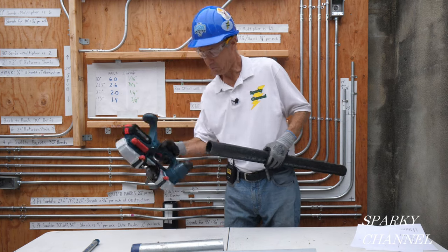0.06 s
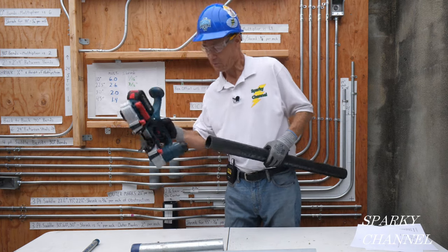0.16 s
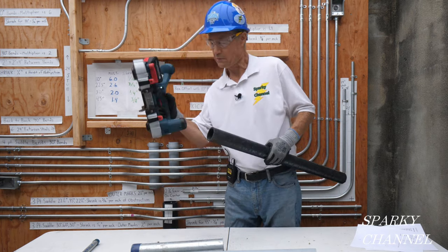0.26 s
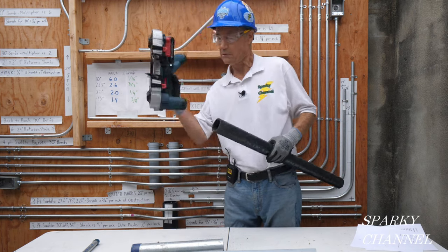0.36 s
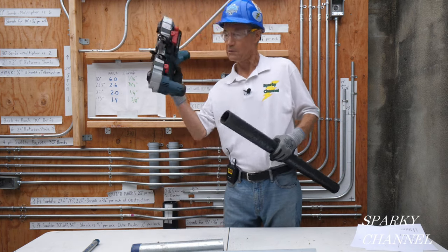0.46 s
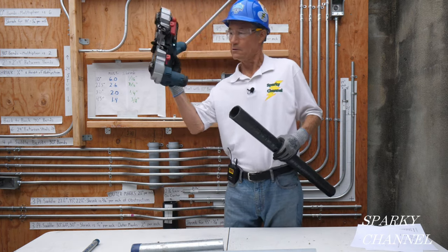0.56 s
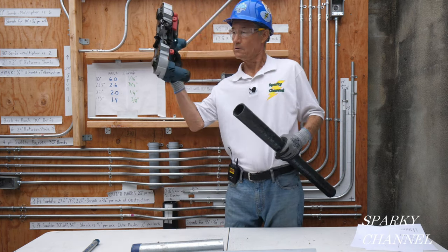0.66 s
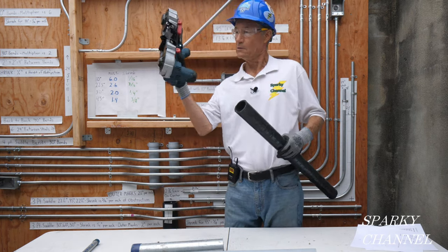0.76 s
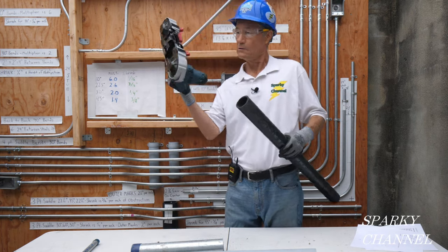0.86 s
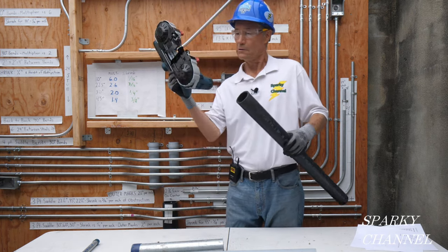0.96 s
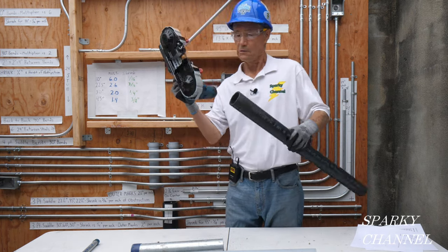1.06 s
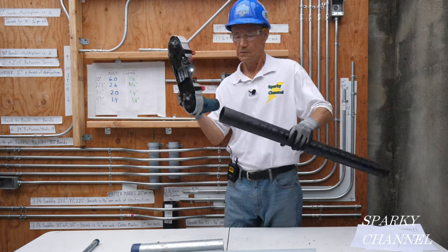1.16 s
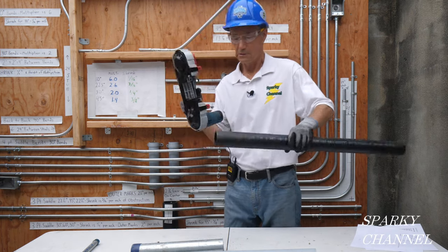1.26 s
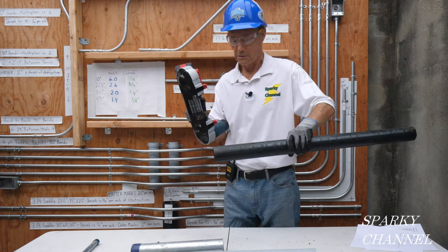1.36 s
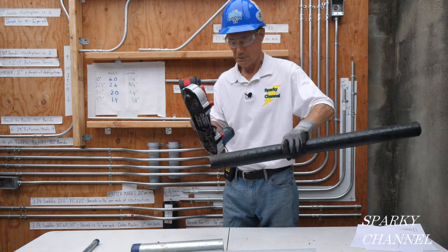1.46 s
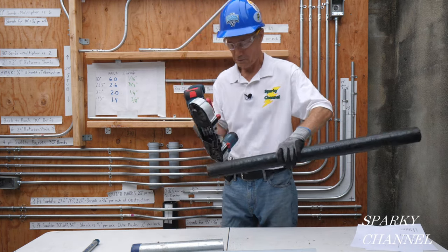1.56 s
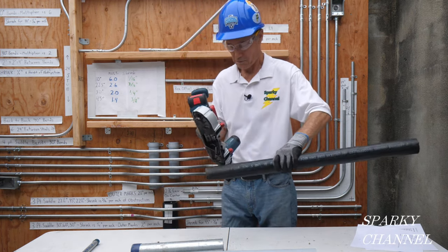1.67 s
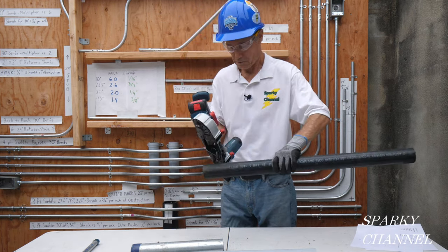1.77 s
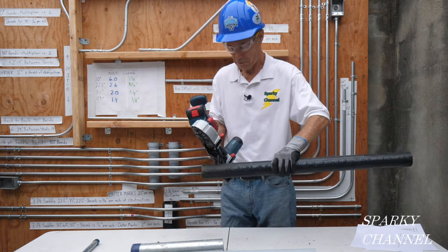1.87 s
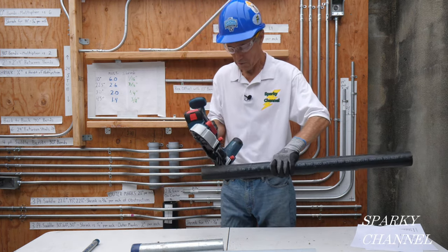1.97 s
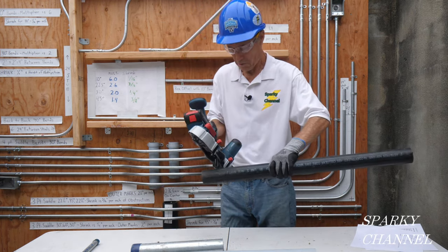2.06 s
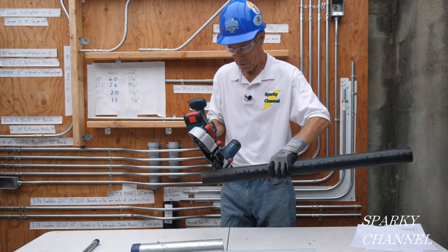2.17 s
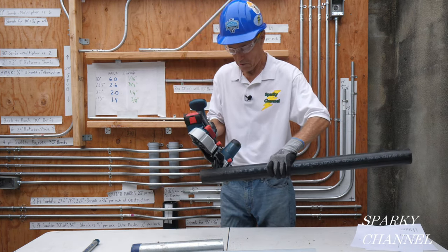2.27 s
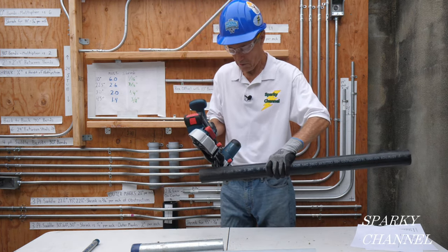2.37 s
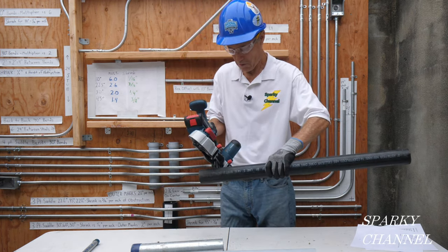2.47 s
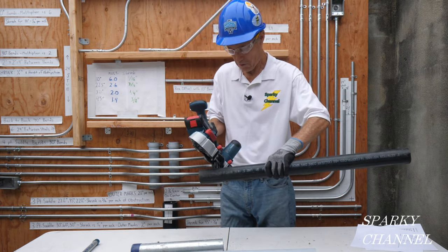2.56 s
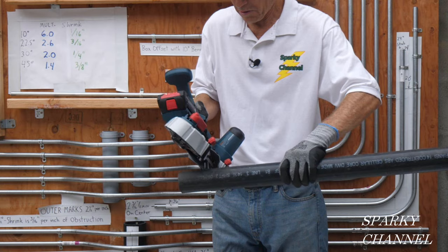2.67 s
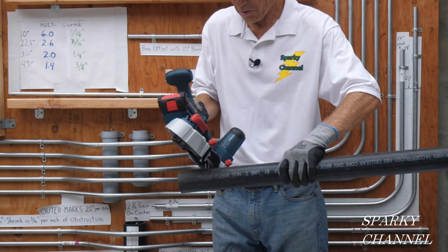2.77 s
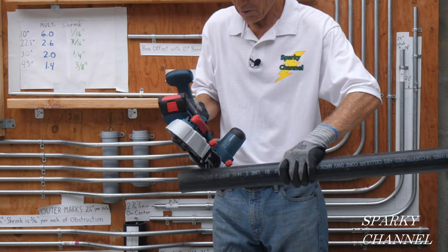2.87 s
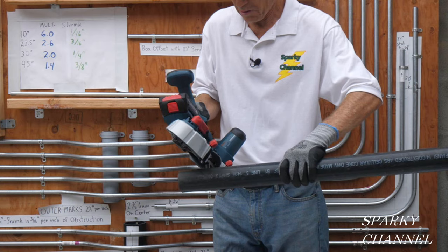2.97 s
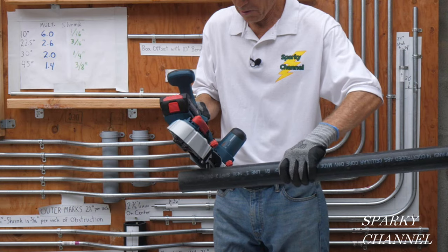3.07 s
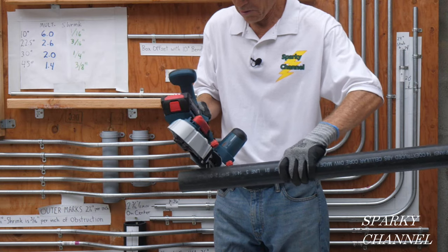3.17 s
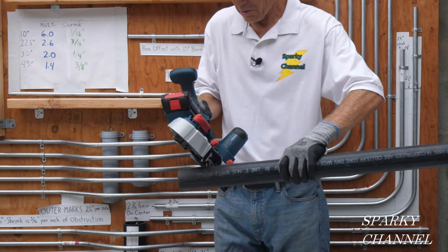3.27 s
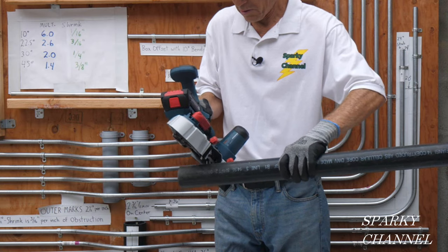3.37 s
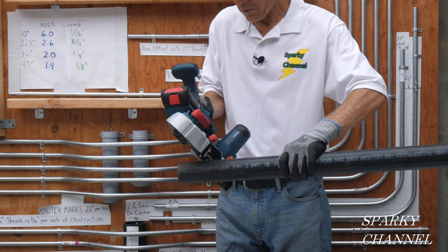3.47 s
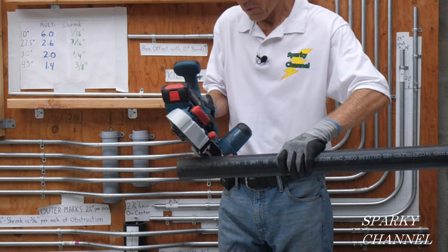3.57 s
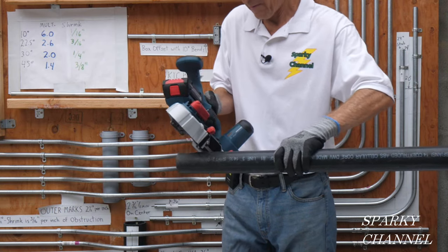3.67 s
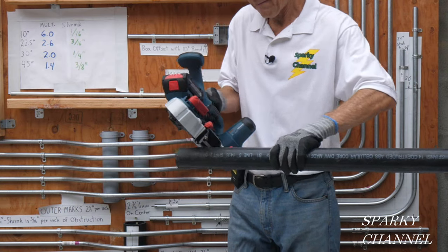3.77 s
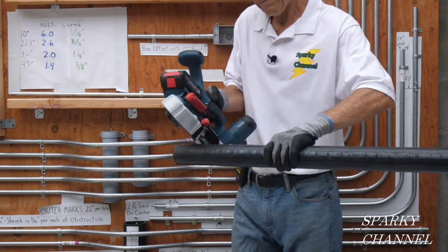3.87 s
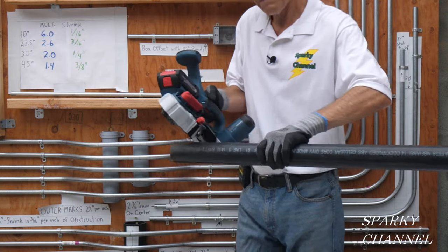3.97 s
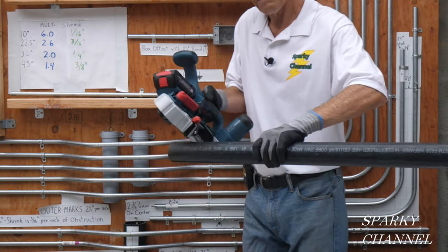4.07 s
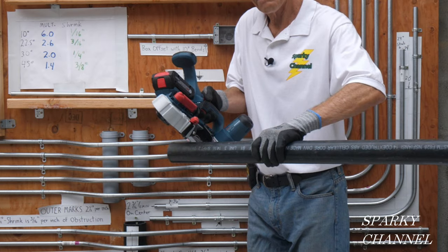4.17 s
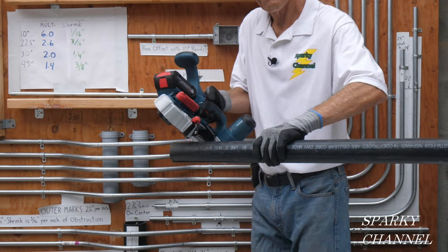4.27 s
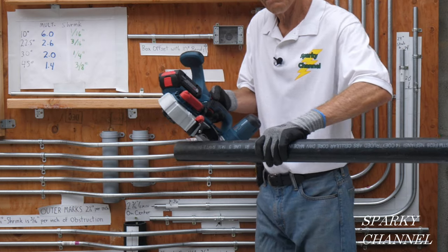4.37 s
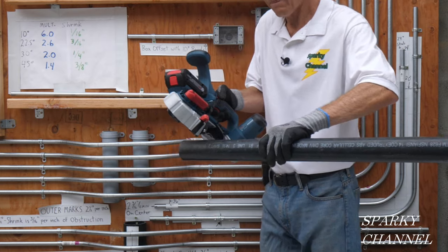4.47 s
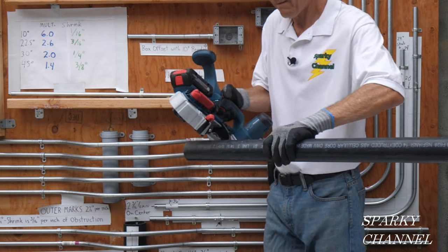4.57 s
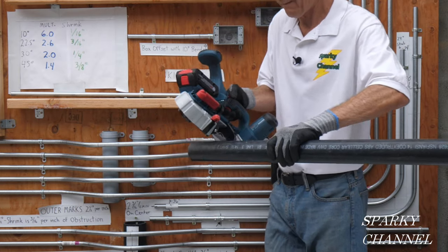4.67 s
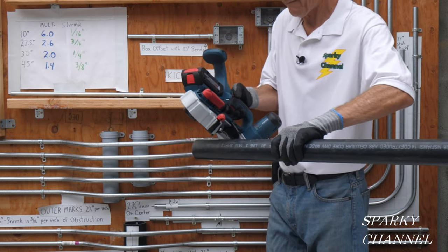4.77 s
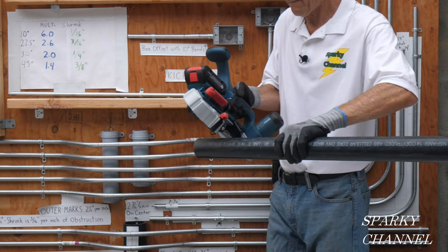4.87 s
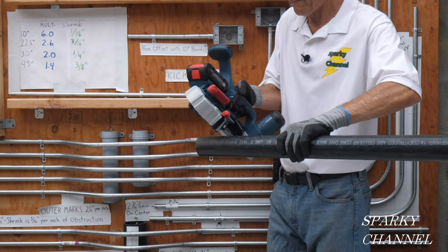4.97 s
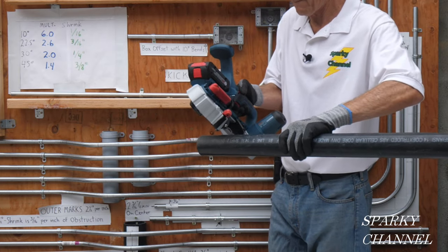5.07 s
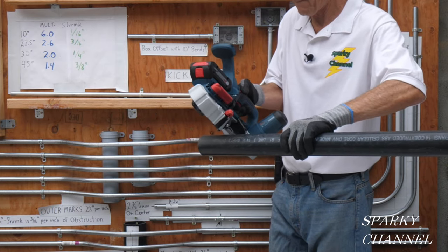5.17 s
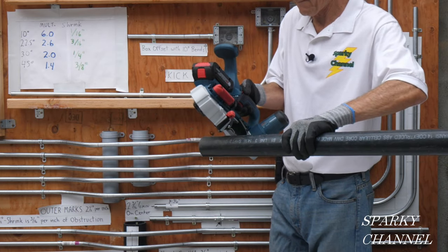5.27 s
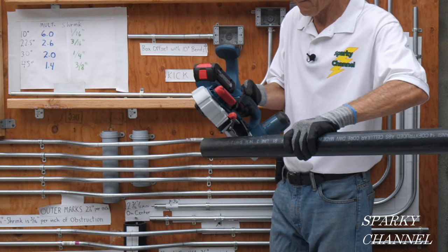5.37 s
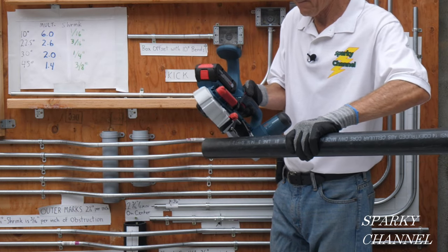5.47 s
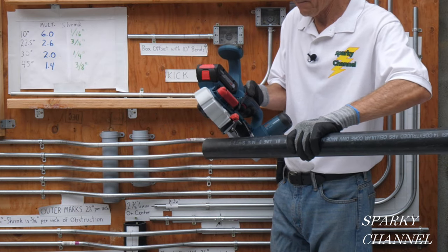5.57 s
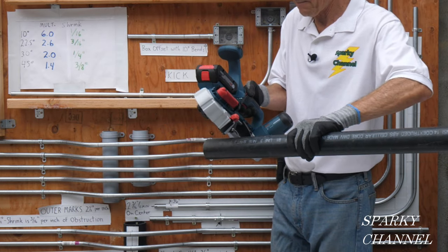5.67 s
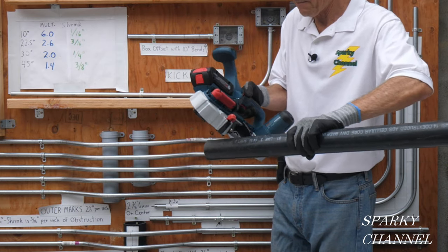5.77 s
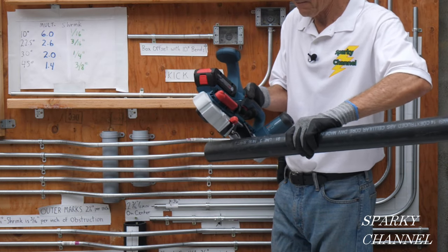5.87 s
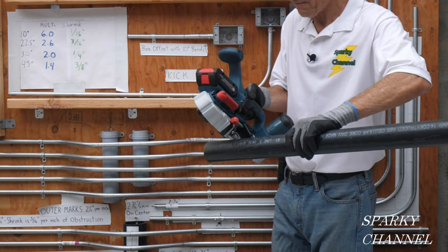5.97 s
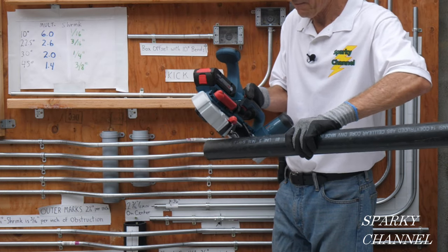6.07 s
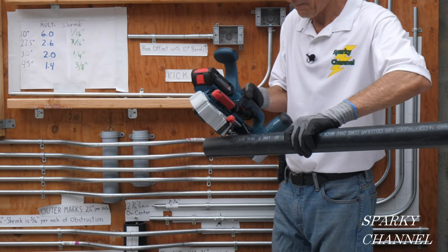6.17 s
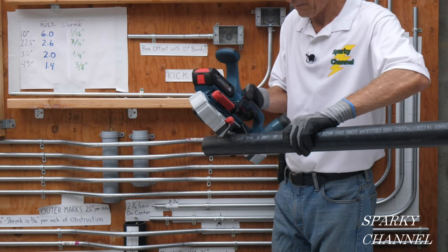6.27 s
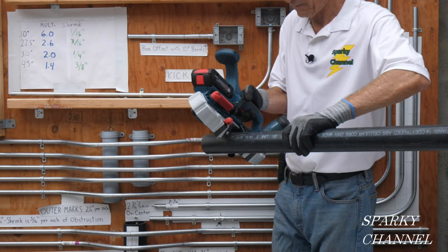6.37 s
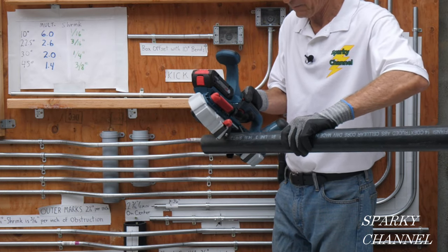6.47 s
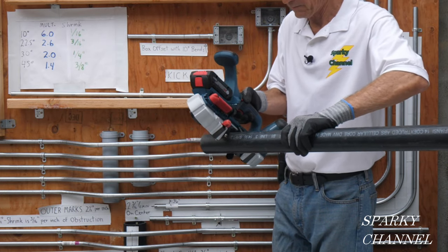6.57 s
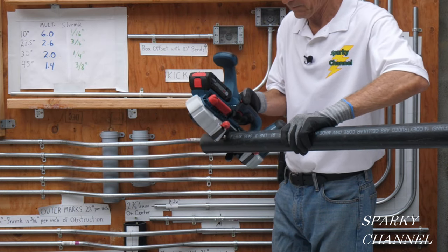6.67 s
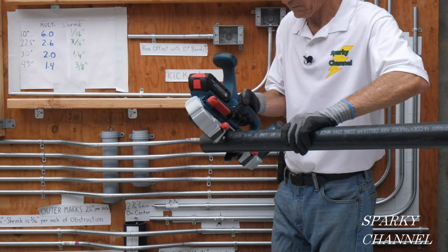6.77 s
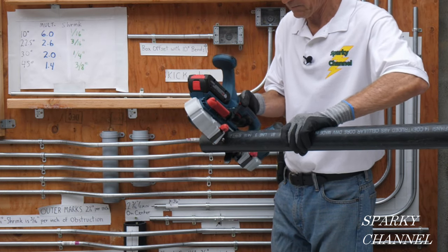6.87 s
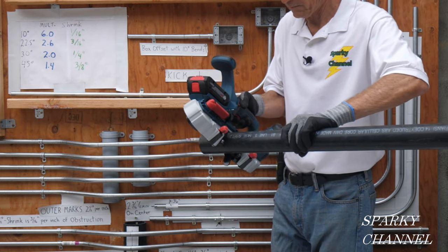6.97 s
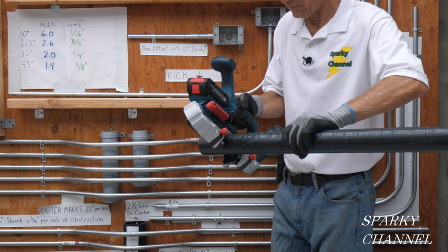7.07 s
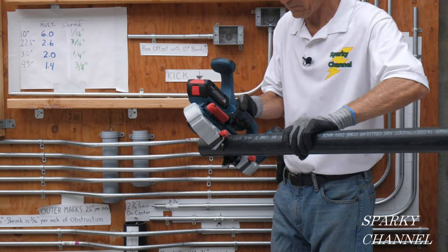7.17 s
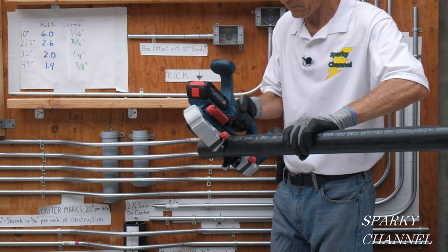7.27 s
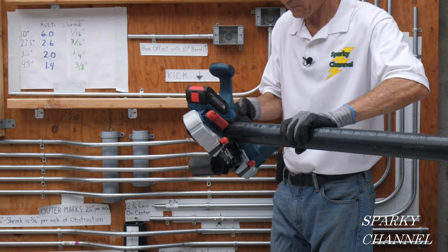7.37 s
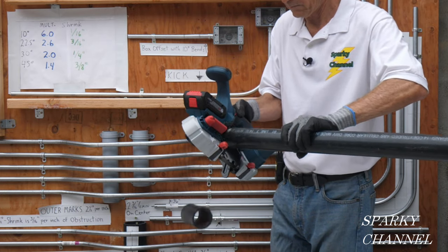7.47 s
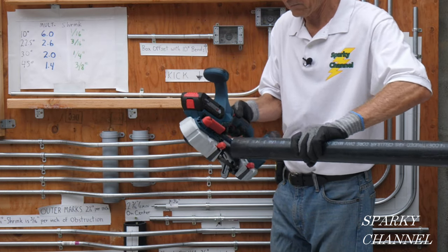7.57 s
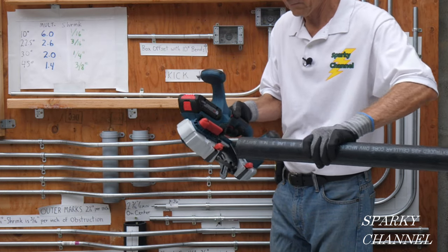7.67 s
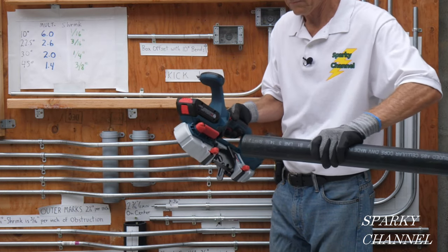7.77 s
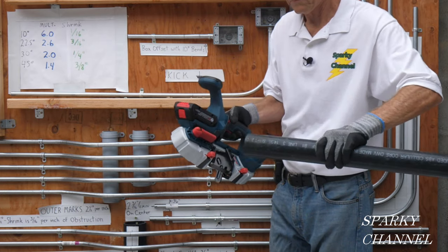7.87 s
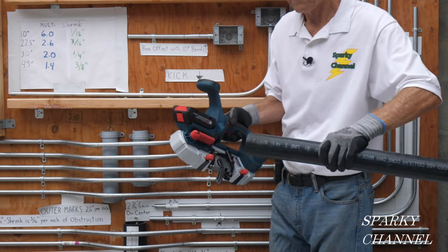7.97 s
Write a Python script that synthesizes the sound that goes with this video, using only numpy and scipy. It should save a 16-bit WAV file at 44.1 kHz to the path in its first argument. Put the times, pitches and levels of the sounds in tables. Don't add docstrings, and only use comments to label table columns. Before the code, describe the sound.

A quiet open workshop, with low distant traffic and wind rumble and faint machinery drones, picked up by one close microphone, nearly mono. A small switch click sounds at the very start, and a sharper double click at 0.5 to 0.65 seconds. The band saw motor then spins up, reaching full speed by about 1.2 seconds: a clear high gear whine over housing roar and bright blade hiss, growing more forward as the saw is lowered. It runs steadily until 5.8, when the blade bites twice with short falling skids. From 6.1 to 7.4 it scrapes through plastic pipe, the pitch sagging and the whine dulled, with groans and a shaking chatter strongest around 6.3 to 6.5, then easing. At 7.4 the speed springs back; the offcut parts with a light knock, strikes the floor loudly and hollowly at 7.7, and bounces near 7.85. The saw keeps whining to the end at 8.

```python
import sys
import numpy as np
from scipy import signal
from scipy.io import wavfile
from scipy.ndimage import uniform_filter1d, minimum_filter1d

SR = 44100
rng = np.random.default_rng(int(sys.argv[2]) if len(sys.argv) > 2 else 0)


def gain_from_db(level_db):
    decades = np.asarray(level_db, float) / 20
    return 10 ** decades


def inscribe(sig):
    pcm = np.round(np.clip(np.atleast_2d(sig).T, -1, 1) * 32767)
    wavfile.write(sys.argv[1], SR, pcm.astype(np.int16))


N = 353241
TIME_S = np.arange(N) / SR

# f/Hz, level/dB
YARD_SPECTRUM = [(100, -30), (160, -15), (250, -10), (420, -18.5), (700, -15), (1100, -17), (1700, -27),
                 (2850, -40.5), (6000, -48.5), (15500, -49)]
YARD_DB = -56.5
# f/Hz, level/dB
RUMBLE_SPECTRUM = [(18, -26), (35, -8), (62, -6), (110, -9), (200, -27), (400, -58)]
RUMBLE_DB, RUMBLE_RISE_DB_PER_S, GUST_DB = -60.5, .5, 1.6
# t/s, length/s, f/Hz, width/Hz, level/dB
DRONES = [
    (.01, .42, 120, 5, -62),
    (.55, .55, 241, 6, -63),
    (.8, 1.05, 61, 8, -63),
    (1.25, .95, 110, 5, -62),
    (4.15, .3, 305, 40, -60),
]

# t/s, peak level/dB, rise/s, t60/s, ring f/Hz
CLICKS = [
    (.004, -36.5, 0.002, 0.025, 2620),
    (.5105, -45, .002, .03, 1800),
    (.513, -36, 0.0016, 0.014, 2900),
    (0.5156, -41, .0006, 0.0099, 5400),
    (0.646, -34, .0008, .012, 3240),
    (.648, -34, 0.00054, 0.02, 2000),
    (7.693, -25, 0.0015, .045, 4900),
]
# f/Hz, level/dB
SWITCH_SPECTRUM = [(400, -10), (1400, 0), (2600, -2), (3600, -11), (6000, -8), (9000, -14), (11000, -11),
                   (15000, -25)]

# t/s, unloaded f/Hz, level/dB
MESH = [(.86, 3812, -50), (1.08, 3812, -47.5), (1.28, 3812, -38), (1.4, 3814, -43), (1.62, 3820, -30),
        (2.2, 3807, -26), (2.5, 3816, -25.5), (2.75, 3807, -25), (3.15, 3822, -25), (3.75, 3816, -28),
        (3.95, 3826, -26), (4.4, 3801, -34), (4.85, 3823, -32), (5.2, 3821, -33.5), (5.5, 3801, -33.5),
        (7.6, 3824, -30), (7.85, 3815, -29), (8.01, 3815, -34)]
# multiple of mesh f, free level/dB, extra level under load/dB
SHAFT_ORDERS = [(.103, -65, 8), (.2, -64, 1), (.5, -63, 17), (.75, -64, 18), (.9, -52, -3), (1.1, -63, 1),
                (1.4, -60, 1), (1.5, -60, 17), (1.6, -61, 1), (3.0, -56, -3)]
START_S, SPIN_HZ_PER_S, SETTLE_S = .672, 7750, .064
FREED_S, RECOVER_S = 7.425, .05

# f/Hz, level/dB
ROAR_SPECTRUM = [(150, -28.5), (400, -19), (700, -20), (860, -14), (1300, -13.5), (2100, -9), (3400, -7.5),
                 (3900, -12), (6100, -21), (9000, -26)]
# f/Hz, width/Hz, level/dB
HOUSING_MODES = [(1000, 270, 9.5), (1647, 590, 12), (2556, 180, 5.5)]
# f/Hz, level/dB
HISS_SPECTRUM = [(2500, -22.5), (4500, -8.5), (6100, -7), (8400, -0.5), (10000, -5.5), (12200, -6.5),
                 (14500, -13), (15800, -15.5)]
# f/Hz, width/Hz, level/dB
GUIDE_MODES = [(4240, 460, 4), (4970, 340, -2.5), (7000, 350, 1), (8400, 500, 0.5), (11450, 120, 3)]
# t/s, length/s, f/Hz, width/Hz, level/dB
TURNS = [
    (.68, 0.32, 2350, 700, -57),
    (.99, 0.38, 2480, 220, -43.5),
    (.72, 0.24, 965, 200, -57.5),
    (.95, .39, 880, 200, -51),
    (1.15, 0.54, 5735, 60, -51),
    (1.45, 0.78, 8900, 800, -45.5),
    (1.9, .51, 10350, 150, -55),
    (2.3, 2.2, 8340, 400, -46.5),
    (4.1, 1.7, 11560, 300, -48),
    (7.45, .6, 8400, 500, -59),
]
ROAR_DB, ROAR_LAW, HISS_DB, HISS_LAW = -33, 1.95, -36, 1.62
SHIELD_DB, LOWERED_S, TURNED_DB = -3, 1.7, -2

# t/s, speed sag/Hz, bite level/dB, whine level change/dB
TOUCH = [
    (5.55, 0, -32, 1),
    (5.68, 40, -33.5, 0.5),
    (5.79, 85, -32, -1.5),
    (5.826, 369.5, -26.5, -14),
    (5.86, 469.5, -37, -10),
    (5.89, 485.5, -27.5, -18),
    (5.93, 420, -36, -19),
    (5.96, 320, -33.5, -5),
    (6.12, 240, -34.5, -15),
]
# t/s, speed sag/Hz, bite level/dB, whine level change/dB
CUT = [
    (6.18, 315, -30, -12),
    (6.26, 550, -24.5, -16),
    (6.33, 560, -27.5, -3.5),
    (6.46, 545, -24.5, -5),
    (6.59, 325, -29, -7.5),
    (6.76, 285, -25.5, -8),
    (6.92, 350, -27, -8.5),
    (7.16, 298, -31, -9),
    (7.41, 310, -30.5, -6.5),
]
BITE_DB = -28
# f/Hz, level/dB
SCRAPE_SPECTRUM = [(150, -13), (700, -3.5), (1700, 0.5), (2600, -2.5), (4200, -1), (6500, -1), (9500, -3),
                   (12500, -11.5), (15800, -16)]
# f/Hz, width/Hz, level/dB
BLADE_MODES = [(1780, 69, 13), (2670, 230, 4.5), (3090, 260, 5.5), (7100, 120, -3), (8400, 180, 7.5),
               (9800, 200, 2), (11480, 220, 10)]
WALL_HZ, WALL_DROP, WALL_DB, WALL_LAW, WALL_FADE_DB_PER_S = 1550, 0.49, -35, 1.7, -23
THRUM_DB, THRUM_LAW, SPAN_HZ, SPAN_DB, SPAN_LAW = -49, 0.6, 5660, -36.5, .8
# t/s, length/s, f/Hz, width/Hz,
# level/dB
WHISTLES = [
    (5.8, 0.038, 5590, 120, -31.5),
    (5.873, .045, 5400, 140, -37.5),
]
WHISTLE_GLIDE = 0.88
# t/s, length/s, f/Hz, width/Hz, level/dB
GROANS = [(5.81, 0.042, 410, 40, -37), (5.93, 0.2, 200, 25, -53.5), (6.14, 0.34, 860, 500, -37.5),
          (6.17, 0.21, 1198, 60, -31.5), (6.33, 0.12, 1205, 60, -31), (6.435, .125, 1193, 80, -25),
          (6.58, 0.32, 1180, 50, -41), (6.6, 0.11, 220, 80, -47), (6.64, 0.15, 1450, 70, -33.5),
          (6.15, 0.33, 1890, 500, -38), (6.6, 0.33, 3050, 400, -43), (7.0, 0.58, 4180, 304, -45)]
# t/s, chatter f/Hz, shake level/dB
CHATTER = [
    (6.12, 213, -54),
    (6.158, 213, -44),
    (6.298, 213, -36),
    (6.388, 230, -44),
    (6.424, 229, -38),
    (6.468, 229, -38),
    (6.51, 245, -42),
    (6.57, 255, -53),
]

# t/s, peak level/dB, pitch factor, t60 factor
KNOCKS = [(7.473, -29, 0.59, 0.29), (7.49, -37, 0.71, 0.69), (7.638, -25, 0.83, 0.26),
          (7.692, -7.5, 1.01, 0.67), (7.6955, -12, 0.99, 0.73), (7.703, -19, 0.89, 0.42),
          (7.7165, -15.5, 1.02, 0.4), (7.83, -21.5, .9, 0.22), (7.841, -29, 0.8, 0.64),
          (7.875, -39, 0.26, 1.4), (7.9, -42, 0.35, .7)]
# f/Hz, level/dB, t60/s
OFFCUT_MODES = [(66, -17.5, .25), (130, -17, 0.26), (290, -5.5, 0.13), (400, 0, 0.083), (527, 1.5, 0.073),
                (700, -9, 0.1), (880, -17, 0.056), (1760, -17, 0.06), (3000, -30, .04), (4900, -25, .03)]


def evened(x):
    return x / np.sqrt(np.mean(x ** 2) + 1e-20)


def curves(rows):
    s, *columns = np.transpose(rows)
    return [np.interp(TIME_S, s, column) for column in columns]


def gate(start_s, stop_s, fade_s):
    return np.interp(TIME_S, [start_s - fade_s, start_s, stop_s, stop_s + fade_s], [0, 1, 1, 0])


def drift(hz):
    return evened(signal.lfilter(*signal.butter(2, hz / (SR / 2)), rng.standard_normal(N)))


def grit(rough_db, hz):
    return rng.standard_normal(N) * gain_from_db(rough_db * drift(hz))


def colour(x, spectrum, modes, patchy_db):
    hz, _, z = signal.stft(x, SR, nperseg=1024, noverlap=768)
    f, db = np.transpose(spectrum)
    field_db = np.interp(np.log(hz + 1), np.log(f), db)
    for centre_hz, width_hz, bump_db in modes:
        field_db = field_db + bump_db / (1 + (2 * (hz - centre_hz) / width_hz) ** 2)
    patches = uniform_filter1d(rng.standard_normal(z.T.shape), size=30, axis=0)
    patches = uniform_filter1d(patches, size=10, axis=1).T
    z = z * gain_from_db(field_db[:, None] + patchy_db * evened(patches))
    return evened(signal.istft(z, SR, nperseg=1024, noverlap=768)[1][:N])


def resonate(x, hz, width_hz):
    turn = np.exp(2j * np.pi * np.cumsum(hz * np.ones(len(x))) / SR)
    r = np.exp(-np.pi * width_hz / SR)
    smooth = signal.lfilter([1], np.convolve([1, -r], [1, -r]), x / turn)
    return evened((turn * smooth).real)


def fuzzy(table, drive, glide=1):
    out = np.zeros(N)
    for s, length_s, hz, width_hz, db in table:
        span = slice(round(s * SR), round((s + length_s) * SR))
        count = len(out[span])
        burst = resonate(drive[span], np.linspace(hz, hz * glide, count), width_hz)
        out[span] += gain_from_db(db) * signal.windows.tukey(count, .5) * burst
    return out


def walls(x, t60_s, wet_db):
    t = np.arange(SR // 2) / SR
    tail = rng.standard_normal(len(t)) * gain_from_db(-60 * t / t60_s) * (t > .006)
    return x + gain_from_db(wet_db) * signal.fftconvolve(x, tail / np.linalg.norm(tail))[:N]


def feed():
    sag_hz, bite_db, damped_db = curves(list(TOUCH) + list(CUT))
    strain = np.exp(-np.clip(TIME_S - FREED_S, 0, 9) / RECOVER_S)
    return sag_hz * strain, bite_db, damped_db * strain


def outdoors():
    air = gain_from_db(YARD_DB) * colour(rng.standard_normal(N), YARD_SPECTRUM, [], patchy_db=-0.2)
    swell_db = RUMBLE_DB + RUMBLE_RISE_DB_PER_S * TIME_S + GUST_DB * drift(hz=5.8)
    rumble = gain_from_db(swell_db) * colour(rng.standard_normal(N), RUMBLE_SPECTRUM, [], patchy_db=1.5)
    return air + rumble + fuzzy(DRONES, rng.standard_normal(N))


def trigger():
    t, out = np.arange(SR // 10) / SR, np.zeros(N)
    noise = colour(rng.standard_normal(N), SWITCH_SPECTRUM, [], patchy_db=-2.0)
    for s, db, rise_s, t60_s, hz in CLICKS:
        span = slice(round(s * SR), round(s * SR) + len(t))
        burst = 0.72 * noise[span] + 1.2 * resonate(rng.standard_normal(len(t)), hz, width_hz=550)
        decay_db = -60 * np.clip(t - rise_s, 0, 1) / t60_s
        out[span] += gain_from_db(db - 10.0 + decay_db) * np.clip(t / rise_s, 0, 1) * burst
    return out


def motor():
    free_hz, _ = curves(MESH)
    sag_hz, _, _ = feed()
    t = TIME_S - START_S
    knee_s = free_hz / SPIN_HZ_PER_S - SETTLE_S
    climb_hz = SPIN_HZ_PER_S * np.maximum(t, .01)
    settling_hz = free_hz - SPIN_HZ_PER_S * SETTLE_S * np.exp((knee_s - t) / SETTLE_S)
    unloaded_hz = np.where(t < knee_s, climb_hz, settling_hz)
    hz = unloaded_hz - sag_hz
    cycles = np.cumsum(hz + 3.5 * drift(hz=14) + .022 * sag_hz * drift(hz=18)) / SR
    return hz, cycles, unloaded_hz / free_hz


def running(cycles, speed):
    speed_db = 20 * np.log10(speed)
    shield_db = SHIELD_DB * gate(0, 1.01, LOWERED_S - 1.1)
    wheel = np.cos(2 * np.pi * .0039 * cycles + .5 * drift(hz=3))
    roar_db = ROAR_DB + ROAR_LAW * speed_db + shield_db + 0.28 * drift(hz=1.7) + 0.1 * wheel
    roar = gain_from_db(roar_db) * colour(grit(rough_db=1.0, hz=500), ROAR_SPECTRUM, HOUSING_MODES, patchy_db=0.72)
    hiss_db = HISS_DB + HISS_LAW * speed_db + shield_db + TURNED_DB * gate(FREED_S, 9, .03)
    hiss_db += 1.1 * wheel + 0.54 * drift(hz=15.0)
    hiss = gain_from_db(hiss_db) * colour(grit(rough_db=1.5, hz=900), HISS_SPECTRUM, GUIDE_MODES, patchy_db=1.74)
    return gate(0.61, 9, .06) * (roar + hiss) + fuzzy(TURNS, grit(rough_db=-0.5, hz=700))


def gears(hz, cycles):
    _, mesh_db = curves(MESH)
    _, _, damped_db = feed()
    load = 0.5 * gate(6.3, 7.42, 0.2) * gate(0, 7.41, .02) + 0.79 * gate(5.8, 7.41, 0.025)
    spun = np.clip(hz / 3800, 0, 1) ** 3
    mesh_db = mesh_db + damped_db + 0.35 * drift(hz=3.7) + 0.17 * drift(hz=40)
    mesh_db += (0.5 + 0.73 * drift(hz=20)) * load
    mesh_db += 3.3 * (1 - spun) * drift(hz=22)
    tone = gain_from_db(mesh_db) * np.sin(2 * np.pi * cycles)
    for order, free_db, load_db in SHAFT_ORDERS:
        order_db = free_db + load_db * load + 2.2 * drift(hz=24)
        tone += spun * gain_from_db(order_db) * np.sin(2 * np.pi * order * cycles)
    return np.sqrt(2) * np.maximum(gate(0.884, 9, .04), .15 * gate(.8, 9, .06)) * tone


def cutting(teeth):
    sag_hz, bite_db, _ = feed()
    push_db = bite_db - BITE_DB
    severed_s = np.clip(TIME_S - 6.75, 0, 1)
    judder = drift(hz=22)

    scrape_db = bite_db + 2.0 + 0.55 * judder
    scrape = gain_from_db(scrape_db) * colour(teeth, SCRAPE_SPECTRUM, BLADE_MODES, patchy_db=1.73)

    wall_db = WALL_DB + WALL_LAW * push_db + WALL_FADE_DB_PER_S * severed_s
    wall_db += 1.1 * judder + 2.9 * gate(6.34, 6.52, .02)
    wall_hz = WALL_HZ - WALL_DROP * sag_hz + 15 * drift(hz=11)
    wall = gain_from_db(wall_db) * resonate(teeth, wall_hz, width_hz=370)

    thrum_db = THRUM_DB + THRUM_LAW * push_db - 8.3 * severed_s + 5.0 * drift(hz=16)
    thrum = gain_from_db(thrum_db) * resonate(teeth, hz=400, width_hz=410)

    span_db = SPAN_DB + SPAN_LAW * push_db + 2.1 * drift(hz=17)
    span = gain_from_db(span_db) * resonate(teeth, SPAN_HZ + 50 * drift(hz=12.0), width_hz=430)

    out = gate(5.8, 9, 0.28) * gate(0, 7.415, 0.037) * (scrape + wall)
    out += gate(5.68, 7.415, 0.14) * thrum
    return out + gate(6.36, 7.39, 0.17) * gate(0, 7.4, 0.026) * span


def whistles_and_groans(teeth):
    return fuzzy(WHISTLES, teeth, WHISTLE_GLIDE) + fuzzy(GROANS, teeth)


def chatter(teeth):
    hz, shake_db = curves(CHATTER)
    phase = 2 * np.pi * np.cumsum(hz + 8.0 * drift(hz=40)) / SR
    shake = gain_from_db(shake_db + 3.0 * drift(hz=35)) * np.sin(phase)
    shake += gain_from_db(shake_db + 3.0 + 3.8 * drift(hz=35)) * np.sin(2 * phase)
    squeal = gain_from_db(shake_db + 2.5) * resonate(teeth, hz=3000, width_hz=60)
    return gate(6.16, 6.52, 0.053) * (shake + squeal)


def offcut():
    out, t = np.zeros(N + SR), np.arange(SR // 3) / SR
    luck = rng.uniform(0.924, 1.04, (len(KNOCKS), len(OFFCUT_MODES)))
    for (s, peak_db, pitch, last), detune in zip(KNOCKS, luck):
        blow = np.zeros(len(t))
        for k, (hz, db, t60_s) in enumerate(OFFCUT_MODES):
            decay = gain_from_db(db - 60 * t / (t60_s * last))
            blow += (-1) ** k * decay * np.sin(2 * np.pi * hz * pitch * detune[k] * t)
        blow *= 1 - np.exp(-t / .0008)
        out[round(s * SR):][:len(t)] += gain_from_db(peak_db) * blow / abs(blow).max()
    return out[:N]


def thud():
    t = np.clip(TIME_S - 7.693, 0, 1)
    band = signal.butter(2, np.array([220, 720]) / (SR / 2), "band")
    boom = signal.lfilter(*band, rng.standard_normal(N))
    return gain_from_db(-20.5 - 60 * t / 0.18) * np.clip(t / 0.0017, 0, 1) * evened(boom)


def scene():
    hz, cycles, speed = motor()
    teeth = grit(rough_db=1.5, hz=664)
    mix = outdoors() + walls(trigger(), t60_s=0.37, wet_db=-13)
    mix += running(cycles, speed) + gears(hz, cycles)
    mix += cutting(teeth) + whistles_and_groans(teeth) + chatter(teeth)
    mix += walls(offcut(), t60_s=0.26, wet_db=-11.0) + thud()
    return np.array([mix, mix])


def roll_off(x):
    return signal.sosfilt(signal.butter(12, 15830, fs=SR, output="sos"), x)


def record(dry):
    shift = 1024 - 276
    hz, t, z = signal.stft(np.pad(dry[0], (shift, 0)), SR, nperseg=2048, noverlap=1024)
    luck = uniform_filter1d(rng.standard_normal(z.shape), size=5, axis=0)
    luck = evened(uniform_filter1d(luck, size=4, axis=1))
    hole_limit = np.interp(hz, [4100, 4600, 11000, 14000, 15500, 15700], [6.5, 2.8, 1.9, 1.1, .8, -.2])
    z = z * (luck < hole_limit[:, None])

    bands = np.repeat(rng.random((65, len(t))) < .65, 16, axis=0)[:len(hz)]
    apart = (rng.random(len(t)) < .45) * bands
    floor = minimum_filter1d(uniform_filter1d(abs(z), size=9, axis=0), size=31, axis=0)
    hash_db = np.interp(hz, [100, 400, 1200, 12000], [-6, -4.5, -7.0, -3.5])
    hash_z = gain_from_db(hash_db)[:, None] * floor * apart * np.exp(2j * np.pi * rng.random(z.shape))
    both = signal.istft(np.array([z + hash_z, z - hash_z]), SR, nperseg=2048, noverlap=1024)[1]
    return roll_off(both[:, shift:shift + N])


dry = scene()
out = record(dry)
inscribe(out)
```